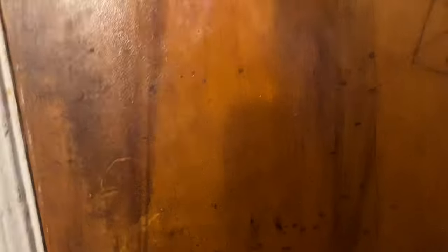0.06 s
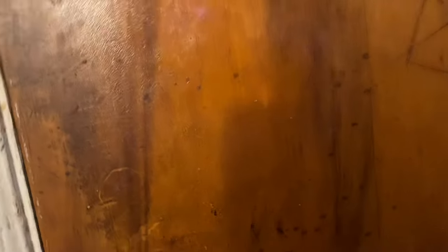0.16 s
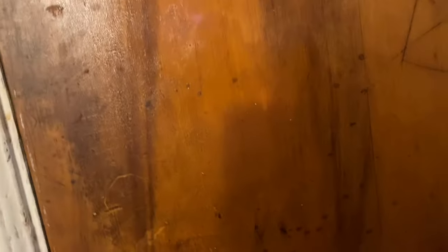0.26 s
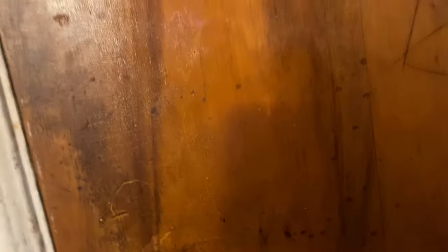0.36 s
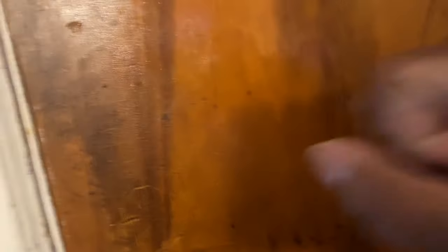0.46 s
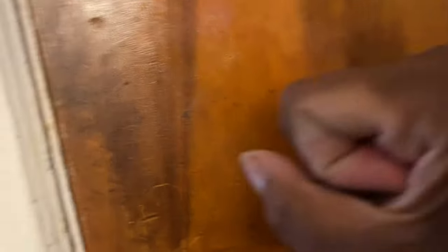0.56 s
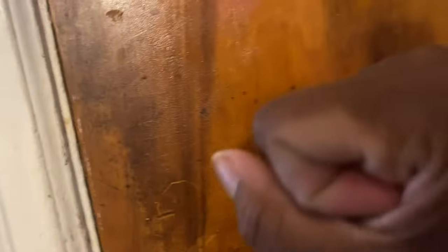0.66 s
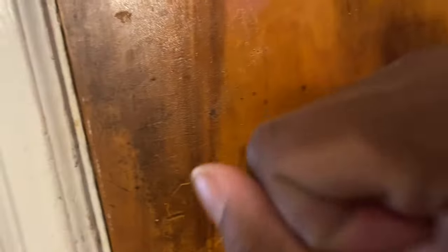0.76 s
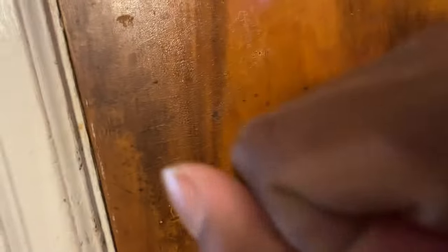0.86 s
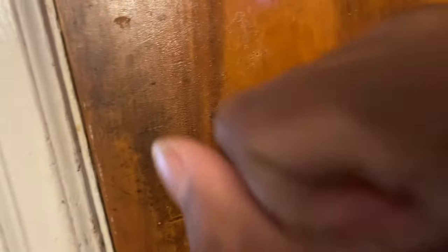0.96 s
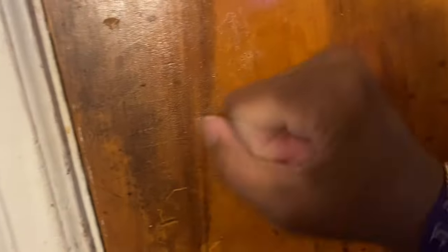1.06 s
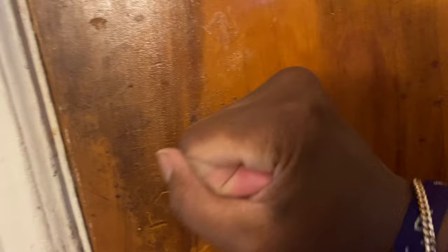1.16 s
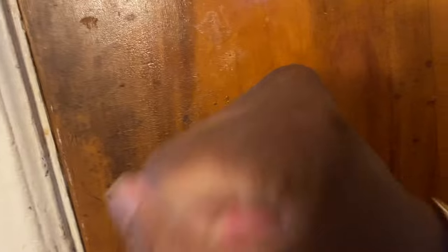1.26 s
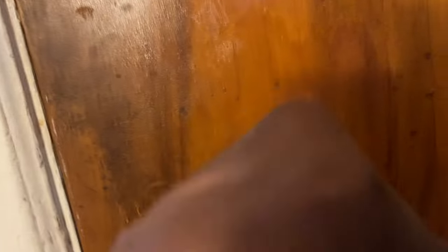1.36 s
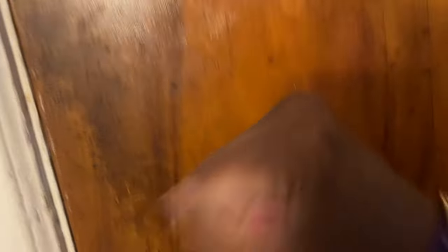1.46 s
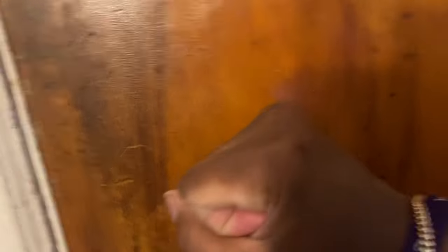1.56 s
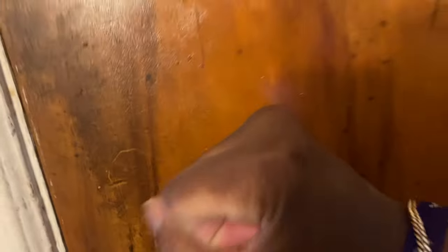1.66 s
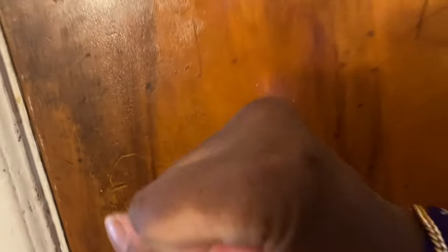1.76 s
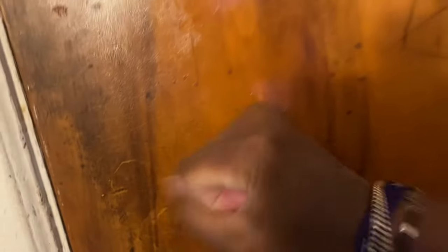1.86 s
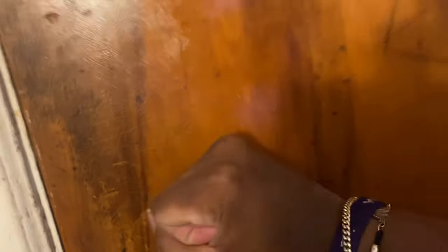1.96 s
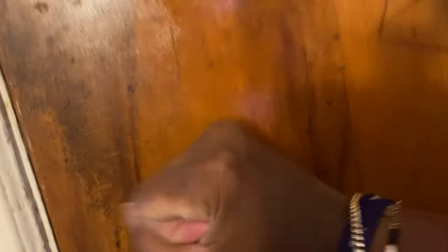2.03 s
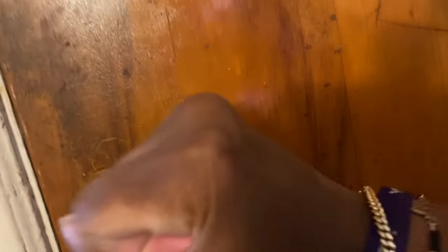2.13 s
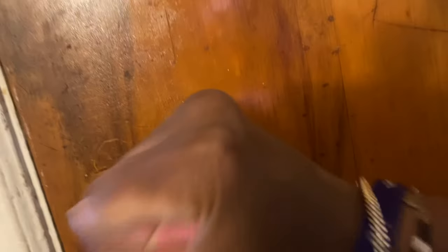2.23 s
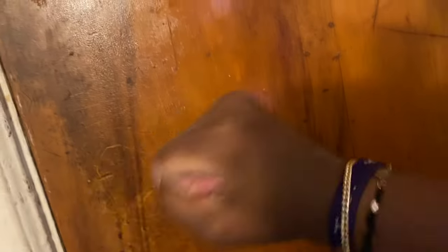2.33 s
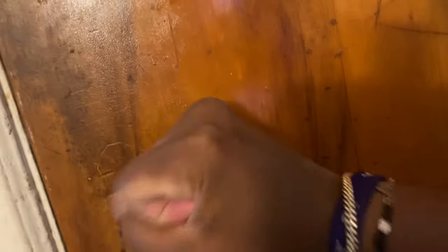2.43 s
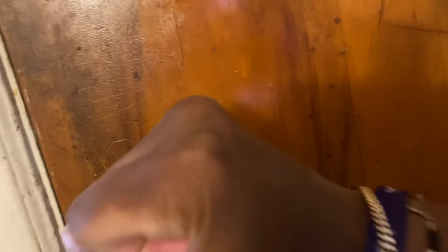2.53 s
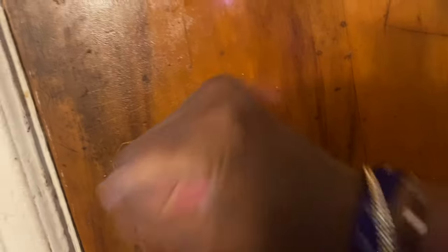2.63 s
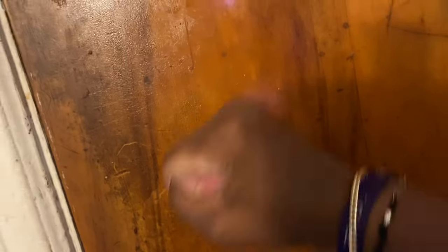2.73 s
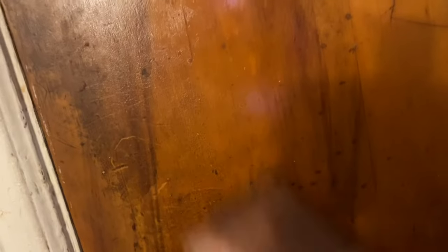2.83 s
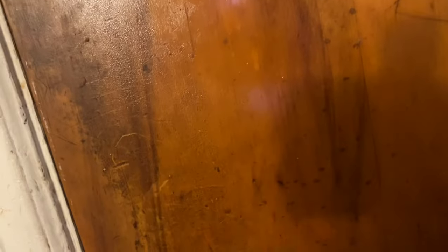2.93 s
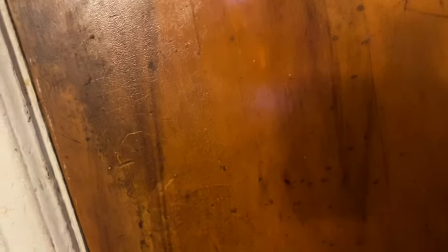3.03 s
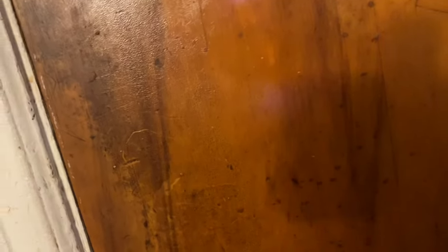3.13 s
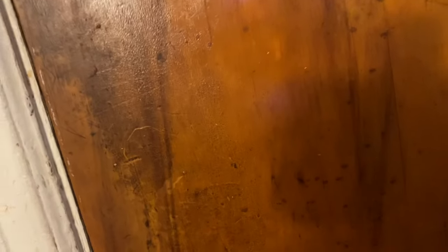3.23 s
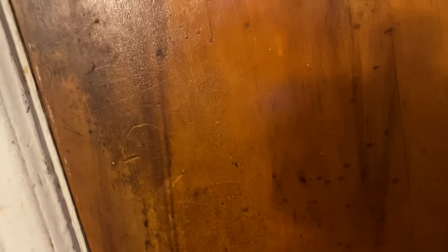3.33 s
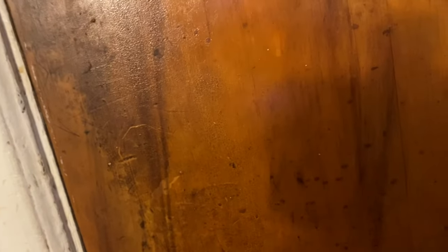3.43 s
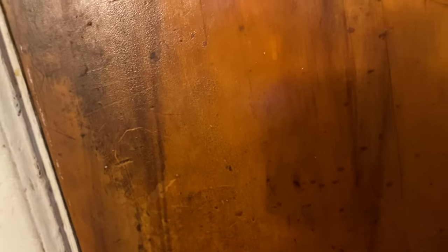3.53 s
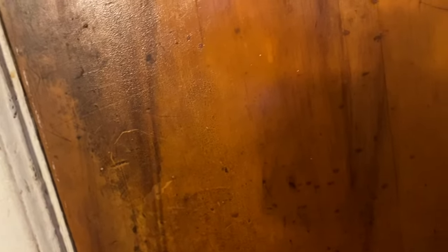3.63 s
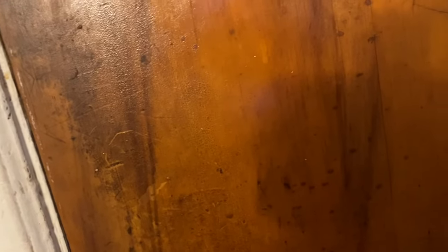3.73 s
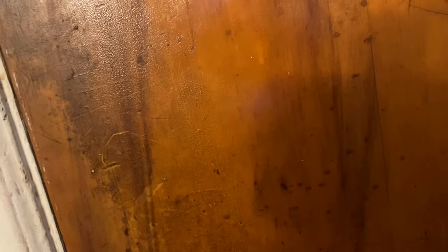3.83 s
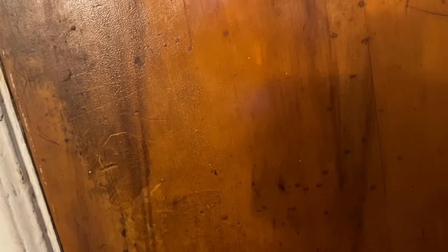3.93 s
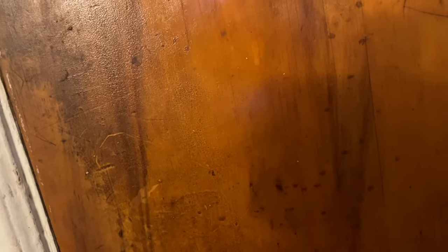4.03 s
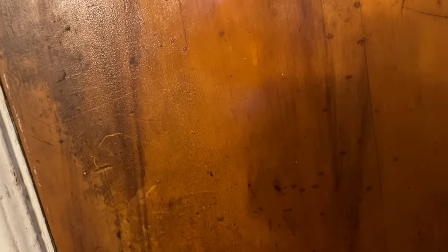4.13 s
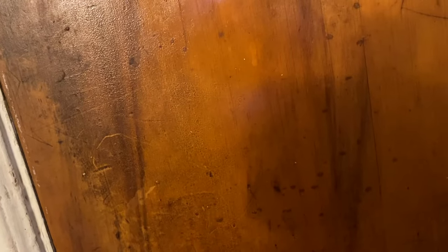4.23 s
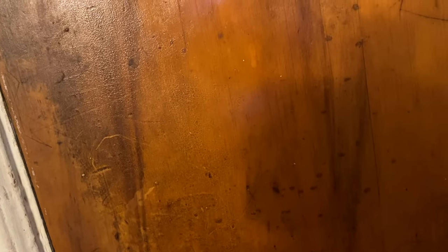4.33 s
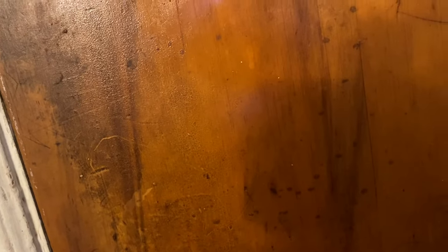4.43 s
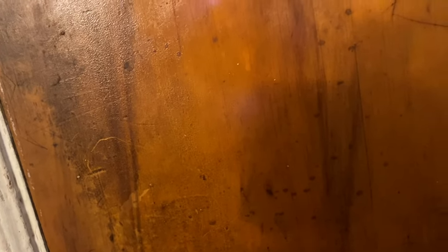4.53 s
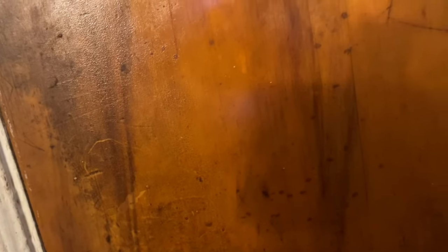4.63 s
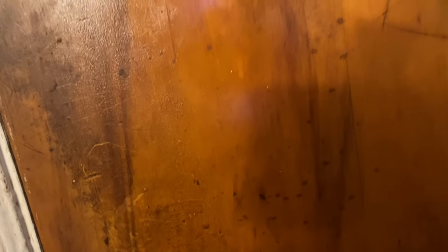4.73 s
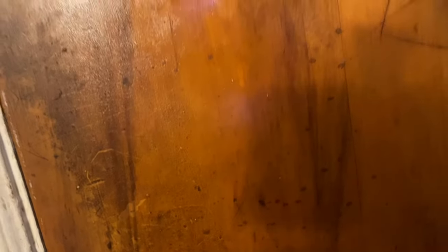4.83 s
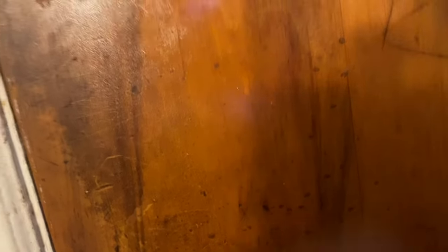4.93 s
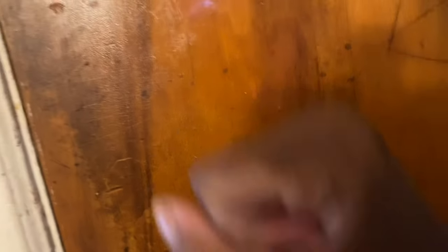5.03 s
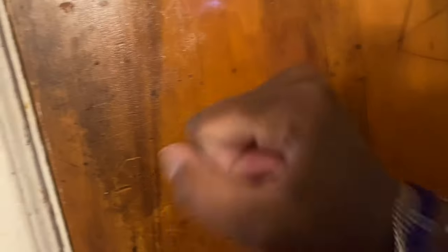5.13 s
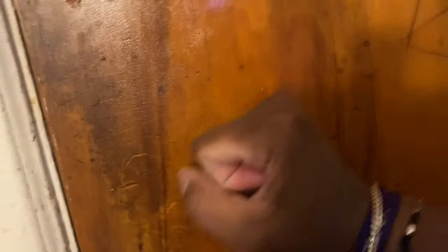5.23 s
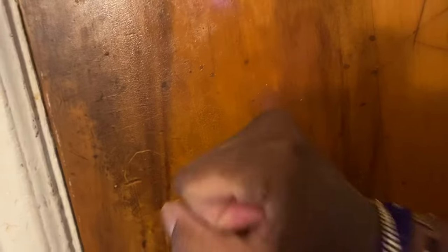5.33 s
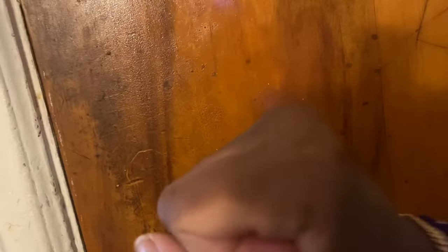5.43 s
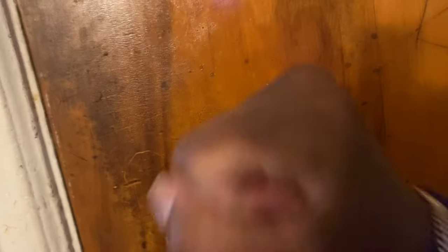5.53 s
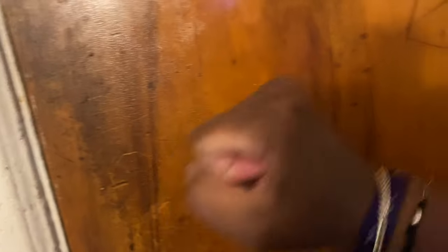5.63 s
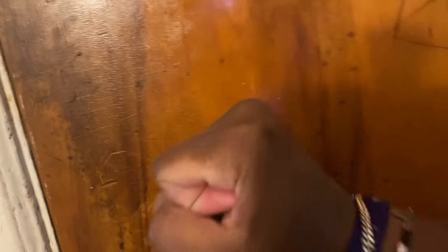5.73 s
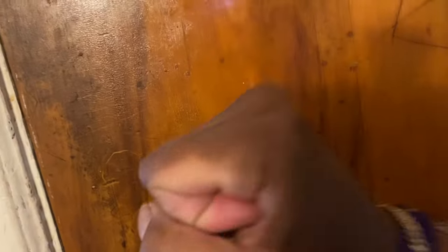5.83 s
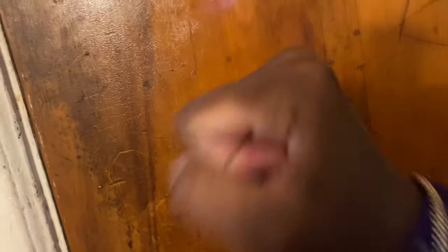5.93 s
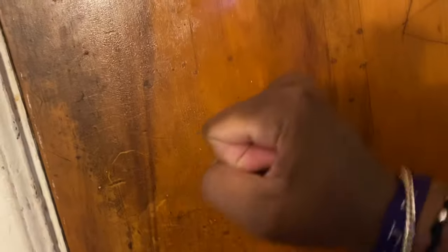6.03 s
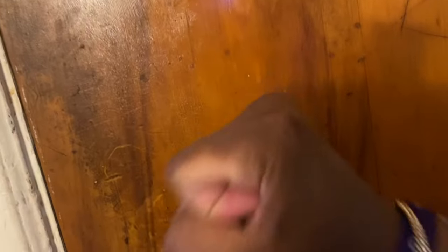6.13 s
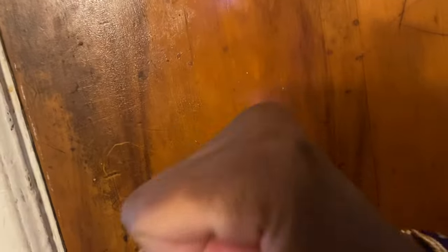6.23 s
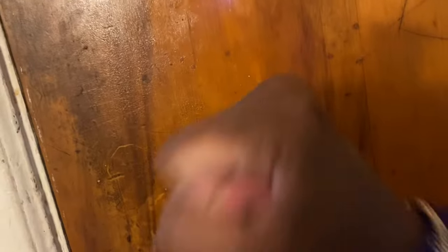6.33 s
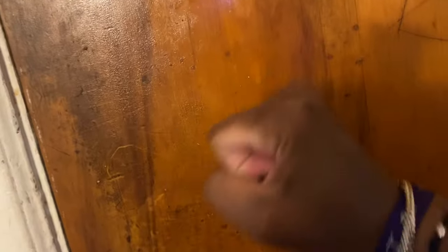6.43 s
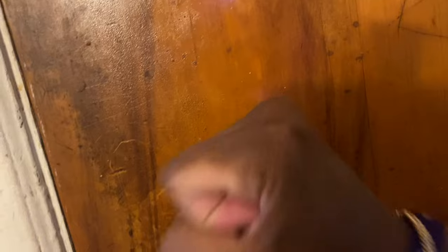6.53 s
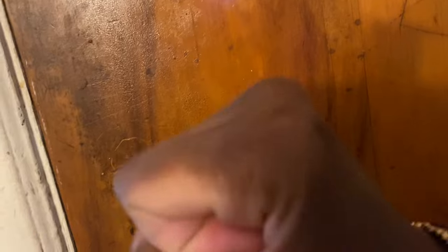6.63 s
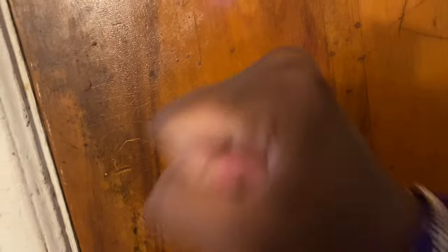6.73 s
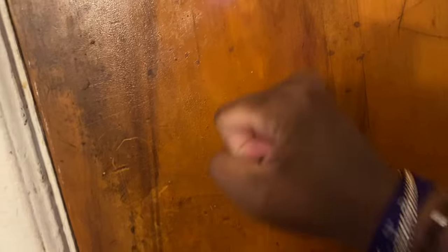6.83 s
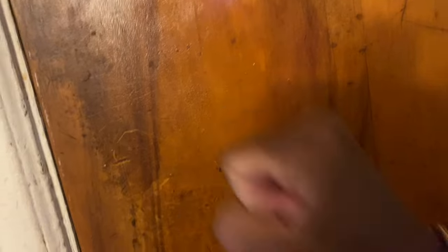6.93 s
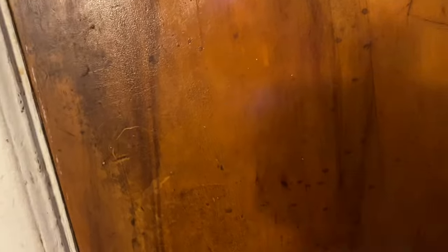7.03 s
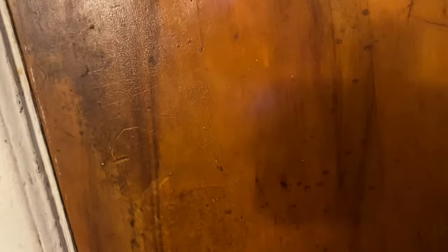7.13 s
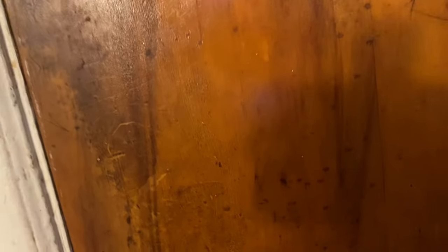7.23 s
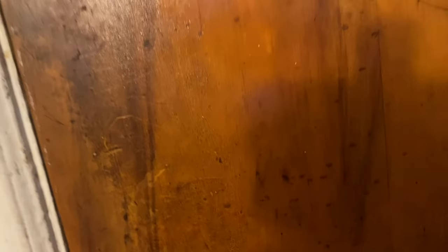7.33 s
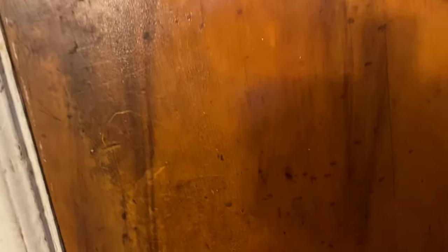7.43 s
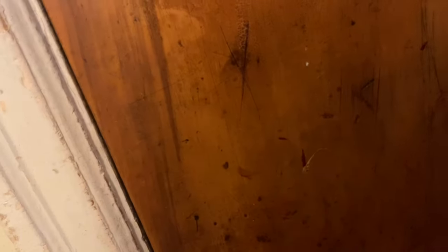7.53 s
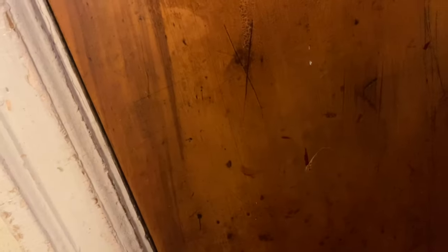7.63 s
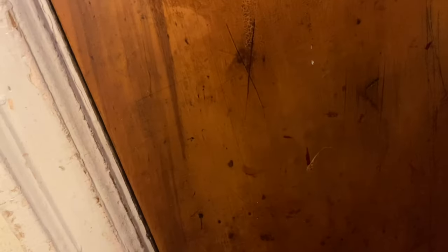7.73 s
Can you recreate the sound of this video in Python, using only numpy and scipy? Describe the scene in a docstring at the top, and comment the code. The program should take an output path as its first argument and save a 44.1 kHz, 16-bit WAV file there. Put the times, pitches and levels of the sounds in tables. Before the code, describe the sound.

A small quiet room opens with a low rumble and a faint, short buzz during the first second. At about 1 second a fist starts knocking on a wooden door, close to the microphone: five firm knocks, roughly 0.4 seconds apart, the last near 2.7 seconds. The door is loose, so each knock is a deep woody thud with a sharp crack and a brief rattle against its stop and latch. A pause follows, holding a very soft rustle near 3.2 seconds and a few tiny bracelet ticks, the clearest just before 5 seconds. From about 5.2 to 6.8 seconds come five more knocks at the same pace and nearly the same strength. Another faint rustle passes around 7.3 seconds, and the low rumble, with a faint wavering hum, continues until the end near 7.8 seconds.

```python
"""A fist knocks ten times on a loose wooden door, close by in a quiet small room.
Each knock is four contacts: the knuckles land, the leaf slams on its stop, rebounds with a crack and
settles. Each contact rings the leaf's modes and shakes wood and latch. Low rumble, a wavering hum,
a short faint buzz, two soft rustles and a few bracelet ticks fill the pauses."""
import sys
import numpy as np
from scipy import signal
from scipy.fft import rfft, irfft, next_fast_len
from scipy.io import wavfile
from scipy.ndimage import uniform_filter1d, minimum_filter1d, map_coordinates

SR = 44100
rng = np.random.default_rng(int(sys.argv[2]) if len(sys.argv) > 2 else 0)


def generate_wav(sig):
    """Save sig (samples, or channels by samples) to the path in sys.argv[1] as 16-bit PCM at SR."""
    pcm = np.round(np.clip(np.atleast_2d(sig).T, -1, 1) * 32767).astype(np.int16)
    wavfile.write(sys.argv[1], SR, pcm)


N = 342877

# left-right likeness of near sources: freq_hz, correlation
NEAR_CORRELATION = [(250, .995), (500, .9), (770, .6), (1170, .5), (1900, .01), (2800, .25), (4100, .65),
                    (5800, .1), (6800, .94)]


def amp(db):
    """dB to gain."""
    return 10 ** (np.asarray(db) / 20)


def along(points, hz):
    """Interpolate (freq_hz, value) points on a log axis."""
    freq_hz, values = np.transpose(points)
    return np.interp(np.log(hz + 1), np.log(freq_hz + 1), values)


def curves(rows):
    """One value per sample for each column after time_s."""
    time_s, *columns = np.transpose(rows)
    return [np.interp(np.arange(N) / SR, time_s, column) for column in columns]


def wobble(rate_hz):
    """Smooth random curve, knots at rate_hz."""
    knots = rng.standard_normal(int(N * rate_hz / SR) + 4)
    return map_coordinates(knots, [np.arange(N) * rate_hz / SR])


def filtered(x, response):
    """Apply a complex frequency response; N samples out."""
    size = next_fast_len(N + SR // 2)
    return irfft(rfft(x, size) * response(np.fft.rfftfreq(size, 1 / SR)), size)[..., :N]


def spread(pair, correlation):
    """Left and right from a shared and an unrelated signal."""
    angle = lambda hz: np.arccos(np.clip(along(correlation, hz), -1, 1)) / 2
    mid, side = filtered(pair, lambda hz: np.array([np.cos(angle(hz)), np.sin(angle(hz))]))
    return np.array([mid + side, mid - side])


def stereo_noise(spectrum):
    """Coloured noise, rms 1."""
    # left-right likeness: freq_hz, correlation
    far_correlation = [(60, 1), (200, 1), (380, .3), (700, .01), (4400, 0.36), (6000, 0.34), (6800, 1)]
    pair = filtered(rng.standard_normal((2, N)), lambda hz: amp(along(spectrum, hz)))
    noise = spread(pair, far_correlation)
    return noise / np.sqrt(np.mean(noise ** 2) + 1e-20)


def room_tone():
    """Lumpy rumble, air and faint hiss."""
    # background levels: time_s, rumble_db, air_db
    levels = [(0, -39, -53), (.35, -45, -58), (.65, -50, -58.5), (.95, -43, -57), (2, -44, -56),
              (3, -48, -63), (3.4, -44, -60), (4.05, -48, -64), (4.65, -48, -61), (5.1, -47.5, -61),
              (7.1, -52, -61), (7.4, -49, -58), (7.77, -43, -59)]
    # noise spectra: freq_hz, density_db
    rumble_spectrum = [(11, -65), (18, -39), (35, -4), (54, -1.5), (74, -1), (108, -26.5), (160, -33),
                       (210, -61), (350, -120)]
    air_spectrum = [(76, -37), (130, -5), (152, -9.5), (184, -7.5), (269, -18.5), (430, -18), (562, -25.5),
                    (1500, -46.5), (1950, -83), (3300, -120)]
    hiss_spectrum = [(700, -120), (1000, -5), (2000, -1), (7000, -13), (12500, -12), (13200, -25),
                     (16000, -29)]
    rumble_db, air_db = curves(levels)
    rumble = amp(rumble_db + 1.5 * wobble(2.5)) * stereo_noise(rumble_spectrum)
    air = amp(air_db + 1.2 * wobble(8)) * stereo_noise(air_spectrum)
    hiss = amp(-83 + .8 * wobble(6)) * stereo_noise(hiss_spectrum)
    return rumble + air + hiss


def hum():
    """Low tone wavering in pitch and level."""
    # hum envelope: time_s, level_db
    levels = [(0, -71.5), (4.1, -67.5), (4.3, -59.5), (7.4, -56), (7.77, -60)]
    pitch_hz = 127 + 6 * wobble(22)
    level_db = curves(levels)[0] + 3 * wobble(9)
    return amp(level_db) * np.sin(2 * np.pi * np.cumsum(pitch_hz) / SR)


def buzz():
    """Faint harmonic stack at steady pitch, swelling twice."""
    # buzz envelope: time_s, level_db
    levels = [(0, -79), (.24, -70), (.33, -63.5), (.42, -62), (.5, -86), (.6, -68.5), (.85, -64),
              (.95, -74), (1.05, -110)]
    # harmonic strengths: freq_hz, gain_db
    colour = [(100, -20.5), (210, -0.5), (350, -3), (480, -10.5), (625, -5.5), (770, -11), (910, -14),
              (1400, -32)]
    t = np.arange(2 * SR) / SR
    harmonic_hz = 69.55 * np.arange(1, 21)[:, None]
    phase = rng.uniform(0, 2 * np.pi, (2,) + harmonic_hz.shape)
    harmonics = amp(along(colour, harmonic_hz)) * np.sin(2 * np.pi * harmonic_hz * t + phase)
    return amp(curves(levels)[0]) * spread(harmonics.sum(axis=1), NEAR_CORRELATION)


def rustle():
    """Soft grainy brushes as the arm drops away."""
    # brushes: start_s, length_s, level_db
    brushes = [(3.17, .15, -78), (7.31, .17, -73)]
    # brush spectrum: freq_hz, density_db
    spectrum = [(600, -40), (1000, -6), (2000, -5), (3000, 0.1), (3800, -6), (7000, -10), (11000, -16),
                (16000, -26)]
    t = np.arange(N) / SR
    rise_s, fade_s = .015, .1
    envelope = sum(amp(db) * np.clip((t - s) / rise_s, 0, 1) * np.clip((s + length_s - t) / fade_s, 0, 1)
                   for s, length_s, db in brushes)
    return envelope * amp(2.5 * wobble(90)) * stereo_noise(spectrum)


def bracelet():
    """Tiny bright ticks: short, broad noise rings with faint tails."""
    # ticks: start_s, gain_db, colour_hz
    ticks = [(0.426, -66, 5720), (0.6984, -65, 6920), (3.465, -72, 1450), (3.893, -76, 7000),
             (3.925, -74, 7000), (3.9454, -65, 6340), (4.1963, -70.5, 7340), (4.8494, -65, 7040),
             (4.9336, -51, 7260), (4.9384, -58, 7470), (4.9445, -59, 7580), (7.605, -68, 6600)]
    out, t = np.zeros((2, N + SR)), np.arange(SR // 10) / SR
    envelope = amp(-60 * t / 0.017) + amp(-15 - 60 * t / 0.21)
    for start_s, gain_db, hz in ticks:
        grit = rng.standard_normal((2, len(t))) * envelope
        band = signal.butter(1, [hz * 0.89, min(hz * 1.3, 16000)], "bandpass", fs=SR, output="sos")
        out[:, round(start_s * SR):][:, :len(t)] += amp(gain_db + 6) * signal.sosfilt(band, grit)
    return spread(out[:, :N], NEAR_CORRELATION)


def ringing(modes, t, max_cycles):
    """Shared and unrelated sums of decaying modes, redrawn per contact."""
    hz, level_db, t60_s = np.transpose(modes)[:, :, None]
    t60_s = np.minimum(t60_s, max_cycles / hz)  # inner friction
    sign = (-1.) ** np.arange(len(modes))[:, None]  # neighbours start opposed, so the ring builds up
    envelope = sign * amp(level_db + rng.normal(0, 2.5, hz.shape) - 60 * t / t60_s)
    # high modes shift with the spot struck
    pitch_hz = hz * (1 + rng.normal(0, .022, hz.shape) * np.minimum(hz / 700, 1) ** 2)
    phase = [[[0]], [[1]]] * rng.uniform(0, 2 * np.pi, hz.shape)
    return (envelope * np.sin(2 * np.pi * pitch_hz * t + phase)).sum(axis=1) * np.minimum(t / 0.00036, 1)


def noise_burst(spectrum, t, rise_s):
    """Pair of bursts; each frequency dies at its own rate."""
    # decay of room and leaf: freq_hz, t60_s
    decay = [(40, 1), (280, 0.4), (740, 0.21), (1940, 0.23), (5120, 0.23), (13500, 0.15)]
    hz, frame_s, bins = signal.stft(rng.standard_normal((2, len(t))), SR, nperseg=512)
    shape = amp(along(spectrum, hz)[:, None] - 60 * frame_s / along(decay, hz)[:, None])
    burst = signal.istft(bins * shape, SR, nperseg=512)[1][:, :len(t)]
    onset_rms = np.sqrt(np.mean(burst[:, :SR // 50] ** 2))
    return burst / onset_rms * (1 - np.exp(-t / rise_s)) ** 2


def crack(t, colour_hz, rise_s, t60_s):
    """Cluster of snaps plus the ring of the shaken latch."""
    # snap spectrum: freq_hz, density_db
    spectrum = [(200, -25.5), (500, -4), (1600, -1.5), (2100, -9), (2800, -12), (4100, -11.5), (6000, -19),
                (9000, -20), (16000, -19.5)]
    # steel latch modes: pitch_hz, level_db, t60_s
    latch_modes = [(1520, -10, .12), (1650, -6, .11), (2600, -15, .14), (2730, -12, .16), (2860, -11, .15),
                   (3100, -19, .2), (3270, -14, .14), (4130, -11, .08)]
    grit = noise_burst(spectrum, t, rise_s)
    grit = grit + 1.8 * signal.lfilter(*signal.iirpeak(colour_hz, 6, SR), grit)  # a small part rings
    snaps = amp(3.5 * np.interp(t * 700, np.arange(400), rng.standard_normal(400)))
    latch = ringing(latch_modes, t, max_cycles=600)
    return amp(-60 * t / t60_s) * snaps * grit + amp(-6) * latch


def contacts(starts_s, body_gains_db, crack_gains_db, colours_hz, kind):
    """Each contact pushes the leaf's modes, swings the leaf, rattles the wood and cracks."""
    # wooden leaf modes: pitch_hz, level_db, t60_s
    leaf_modes = [(52.7, -3.5, 0.46), (71.5, -8, 0.23), (89.75, -11.5, .42), (107, -11.5, .42),
                  (128, -4.5, .26), (151, -8.5, 0.34), (189.5, -14, 0.37), (193.4, -14.5, .38),
                  (230, -14.5, 0.3), (271.5, -10, .1), (285, -19, 0.34), (302, -2.5, 0.1),
                  (340, -16.5, 0.18), (365, -4.5, 0.14), (438.5, -10.5, .15), (459, -9.5, 0.19),
                  (515, -14.5, .15), (610.3, -15.5, 0.062), (656, -15, 0.11), (705, -8, 0.094),
                  (773.6, -11, 0.14), (903, -16.5, 0.066), (1022.6, -17.5, .09), (1177, -14.5, 0.096),
                  (1228, -18.5, 0.1), (1400, -22, .07)]
    # wood rattle spectrum: freq_hz, density_db
    rattle_spectrum = [(100, -10), (300, 1.5), (700, 1.5), (1400, -6), (2000, -15.5), (2800, -19.5),
                       (4100, -25), (6000, -28), (9000, -29.5), (16000, -29)]
    ring_db, rattle_db, crack_db, swing_db, contact_s, rise_s, crack_t60_s, lead_s = kind
    out, t = np.zeros((2, N + SR)), np.arange(SR // 2) / SR
    progress = (np.arange(SR // 40) / SR - lead_s) / contact_s  # the crack leads the push
    push = np.sin(np.pi * np.clip(progress, 0, 1)) ** 2  # longer contact, duller ring
    swing_hz = 82  # whole leaf on its hinges, heavily damped
    swing_envelope = amp(swing_db - 60 * t / 0.1) * (1 - np.exp(-t / 0.01)) ** 2
    swing = swing_envelope * np.sin(2 * np.pi * swing_hz * (t - .009))
    for start_s, body_db, snap_db, colour_hz in zip(starts_s, body_gains_db, crack_gains_db, colours_hz):
        wood = ringing(leaf_modes, t, max_cycles=100)
        ring = amp(ring_db) * signal.fftconvolve(wood, push[None] / push.sum(), axes=1)[:, :len(t)]
        rattle = amp(rattle_db) * noise_burst(rattle_spectrum, t, rise_s)
        snap = amp(crack_db + snap_db) * crack(t, colour_hz, rise_s, crack_t60_s)
        out[:, round(start_s * SR):][:, :len(t)] += amp(body_db) * (ring + swing + rattle) + snap
    return out[:, :N]


def door_knocks():
    """Knuckles land; the loose leaf slams on its stop, rebounds and settles."""
    # knocks: start_s, settle_after_s, land_db, slam_db, slam_crack_db, rebound_db, rebound_crack_db,
    # settle_db, crack_hz
    knocks = [(1.037, .089, -1, 3, 3, -3, -2, -3, 4050), (1.454, .072, -1, 0, 3, 0, -1.5, 0, 2850),
              (1.845, .071, 2, -1, 2, 3, 0, 0, 2800), (2.276, .065, -1, 1, 0, 3, 3, -2, 2680),
              (2.653, .063, 4, 2, 3, 0, 0, 5, 2750), (5.155, .063, -2, -1, -5, -5, -1, -2, 2650),
              (5.58, .066, -3, -1, -3.5, 1, 1.5, 2, 2700), (5.965, .064, 1.5, 2, 2, -5, .6, 0, 2800),
              (6.371, .07, 1, 0, -1, 1, -2, 0, 2750), (6.771, .078, 1, -2, -3, -3, 2, -2, 2860)]
    # contact kinds: ring_db, rattle_db, crack_db, swing_db, contact_s, rise_s, crack_t60_s, lead_s
    land = (-11.5, -26, -33, 1.5, .0062, .0046, .36, .00089)
    slam = (-4.3, -21, -24, -13, .00085, .003, .075, .007)
    rebound = (-9.5, -23, -17, -20, .001, .0017, .06, .0021)
    settle = (-23, -44, -34, -27, .0026, .0021, .07, .00092)
    # stereo balance: freq_hz, left_minus_right_db
    balance = [(300, 0), (770, -3.5), (1170, 0), (2700, 1.8), (4200, .7), (5500, 3), (9000, 0)]
    (start_s, settle_after_s, land_db, slam_db, slam_crack_db,
     rebound_db, rebound_crack_db, settle_db, crack_hz) = np.transpose(knocks)
    slam_after_s, rebound_after_s = .016, .0315
    settle_hz = np.full(len(knocks), 1200)
    pair = contacts(start_s, land_db, land_db, crack_hz, land)
    pair += contacts(start_s + slam_after_s, slam_db, slam_crack_db, crack_hz, slam)
    pair += contacts(start_s + rebound_after_s, rebound_db, rebound_crack_db, crack_hz, rebound)
    pair += contacts(start_s + settle_after_s, settle_db, settle_db, settle_hz, settle)
    stereo = spread(pair, NEAR_CORRELATION)
    return filtered(stereo, lambda hz: amp(np.outer([.5, -.5], along(balance, hz))))


def scene():
    """All sources; the bass shifts right as the hand-held microphones turn."""
    # bass balance: time_s, left_minus_right_db
    turn = [(2.4, 0), (2.6, -1), (3, 0), (4, -.5), (4.5, -2.2)]
    mix = door_knocks() + bracelet() + rustle() + room_tone() + hum() + buzz()
    bass = filtered(mix, lambda hz: 1 / (1 + (hz / 450) ** 4))
    return mix + bass * (amp(np.outer([.5, -.5], curves(turn)[0])) - 1)


def record(dry):
    """Treble lag on the left, bass roll-off, peak limiter, brief level dip, band limit."""
    # level dip: centre_s, half_width_s, depth_db
    dip = (7.496, 0.022, 27)
    centre_s, half_width_s, depth_db = dip
    ceiling, span_samples, top_hz = .9, round(.002 * SR), 15900
    lag_rad = lambda hz: np.pi * np.clip(hz - 7000, 0, None) / 4200
    x = filtered(dry, lambda hz: np.exp(1j * np.array([-lag_rad(hz), lag_rad(hz)])))
    x = filtered(x, lambda hz: (1j * hz / (38 + 1j * hz)) ** 2)  # microphones drop the deepest bass
    limiter_gain = np.minimum(1, ceiling / (np.abs(x).max(axis=0) + 1e-9))
    x = x * uniform_filter1d(minimum_filter1d(limiter_gain, 2 * span_samples + 1), span_samples)
    x = x * amp(-depth_db * np.clip(1 - np.abs(np.arange(N) / SR - centre_s) / half_width_s, 0, 1))
    return filtered(x, lambda hz: np.clip((top_hz - hz) / 300 + .5, 0, 1) ** 2)


dry = scene()
out = record(dry)
generate_wav(out)
```